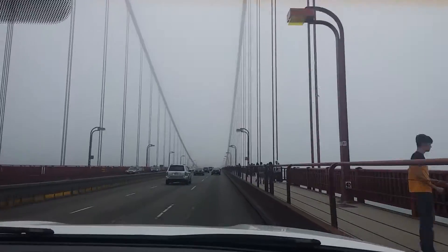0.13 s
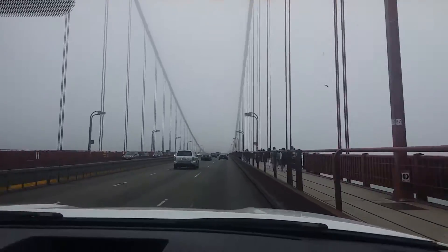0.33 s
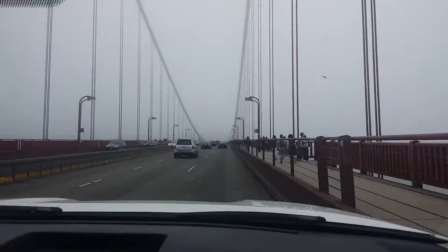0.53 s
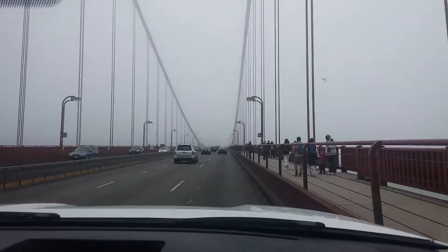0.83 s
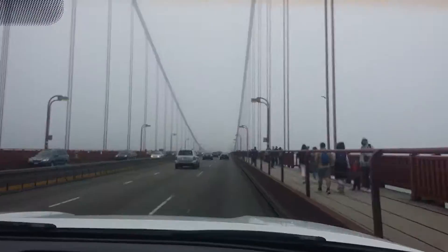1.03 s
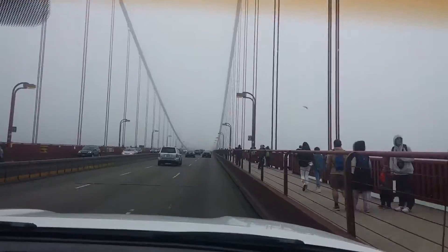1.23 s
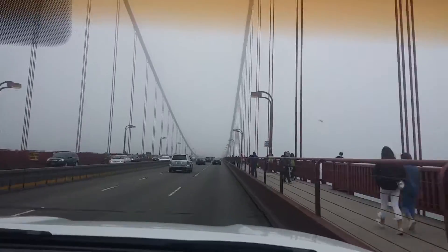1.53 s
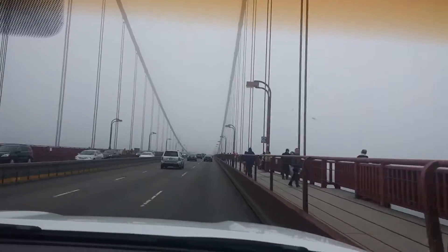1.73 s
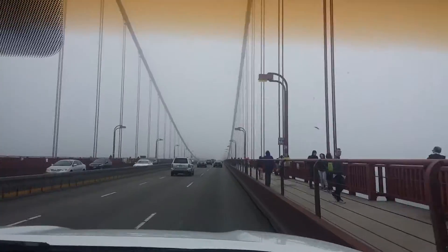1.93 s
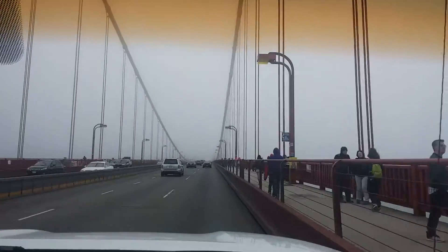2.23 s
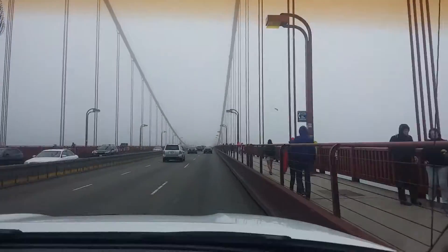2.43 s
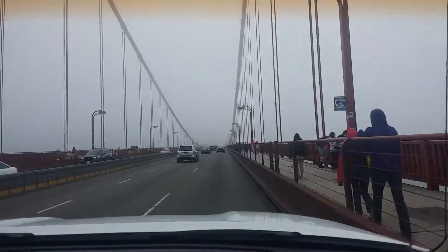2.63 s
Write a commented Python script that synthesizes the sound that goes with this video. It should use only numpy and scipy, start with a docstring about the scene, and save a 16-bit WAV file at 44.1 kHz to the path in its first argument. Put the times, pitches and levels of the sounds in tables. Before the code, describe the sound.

Deep, steady engine drone and boomy tyre roar inside a closed car cabin, bass slightly uneven with the road surface. At about 0.4-0.5 s wheels hit a joint with heavy, quick thumps, a lighter slap following at 0.6; trim rustles, ticks and squeaks faintly until 0.8. A small tick sounds near 1.3. Another double thump and rattle comes around 2.1 s, a faint slap at 2.25, then drone continues.

```python
"""Inside a car driving steadily over a bridge: the engine drones low and tyre roar booms in the cabin.
The wheels cross two road joints; each thumps the body and shakes the dashboard trim,
which rustles, ticks and gives tiny high squeaks. The drone is a sum of partials, the roar is
filtered noise, the thumps are struck resonators with noise slaps; the trim is made of
noise bursts (ticks), short chirps (squeaks) and random grains (rustle)."""
import sys
import numpy as np
from scipy import signal
from scipy.fft import rfft, irfft, next_fast_len
from scipy.io import wavfile

SR = 44100
rng = np.random.default_rng(int(sys.argv[2]) if len(sys.argv) > 2 else 0)


def log_audio(samples):
    """Write samples as a 16-bit WAV file to the path given in sys.argv[1]."""
    # one column per channel
    frames = np.atleast_2d(samples).T
    # limit to full scale, then quantise
    limited = np.clip(frames, -1, 1)
    pcm = np.round(limited * 32767).astype(np.int16)
    wavfile.write(sys.argv[1], SR, pcm)


N = 122598
T = np.arange(N) / SR   # time [s]

# Weaker engine partials: (multiple of the firing rate, level re the fundamental [dB])
ENGINE_PARTIALS = [(1.5, -15), (2, -22), (5, -27.5)]
# Tyre roar through the body: (frequency [Hz], spectral density [dB per Hz])
ROAR_SPECTRUM = [(20, -77), (35, -67), (48, -56), (61, -45.5), (76, -44.5), (95, -48.5), (117, -40),
                 (145, -47.5), (175, -57.5), (225, -56), (255, -58.5), (290, -57), (340, -60.5), (380, -55),
                 (425, -58.5), (470, -62.5), (590, -64), (665, -62), (730, -65.5), (1000, -69.5),
                 (1400, -78), (2000, -86), (3000, -91), (4500, -96.5), (6000, -105), (9300, -111),
                 (10500, -121), (15500, -118)]
# Coarseness of the road surface, as gain on the bass of the roar: (time [s], level [dB])
SURFACE_COARSENESS = [(0, 9.5), (.2, -2.5), (.4, 3.5), (.6, 2.5), (0.748, -2.5), (.9, 0), (1.3, 0.5),
                      (1.55, 3), (1.9, -1), (2.2, 2), (2.38, 3), (2.55, 0.5)]
# A wheel strikes a joint or a patch:
# (time [s], body ring level [dB], slow boom level [dB], tread slap level [dB], slap centre [Hz])
WHEEL_BUMPS = [(.423, -9.5, -17, -24.5, 610), (.453, -12, -13, -38, 540), (0.469, -16.5, -16.5, -31, 550),
               (0.486, -22, -17, -37, 500), (.613, -24, -37, -21.5, 600), (2.055, -10.5, -28, -25, 450),
               (2.071, -8, -20, -21, 430), (2.096, -18, -27.5, -46, 490), (2.129, -31, -10.5, -30, 600),
               (2.254, -28, -35, -24.5, 500), (2.269, -26, -36, -31.5, 410)]
# Modes of body panels and cabin air: (frequency [Hz], level re the blow [dB], t60 [s])
BODY_MODES = [(120.3, 3.5, 0.077), (137, -13, 0.36), (264, -11, .08), (418, -12, .09), (500, -44, .08)]
# Loose trim ticks: (time [s], level [dB], centre [Hz], t60 [s])
TRIM_TICKS = [(0.186, -47, 5200, .025), (.228, -50, 6000, 0.042), (.416, -46, 5200, 0.07),
              (.423, -40, 3000, 0.034), (.452, -48, 4200, .035), (.465, -41, 3000, .025),
              (0.48, -39, 3800, 0.034), (.505, -46, 5200, 0.033), (.749, -50, 6500, .04),
              (.777, -53, 7500, 0.032), (1.198, -47, 3800, .03), (1.281, -35.5, 2350, 0.037),
              (1.2963, -41.5, 5030, 0.021), (1.452, -40, 2600, 0.025), (2.072, -42.5, 3940, 0.034),
              (2.087, -46, 4000, .035), (2.105, -38, 2920, .03), (2.135, -50, 8000, .035),
              (2.161, -52, 5470, 0.047), (2.177, -47, 5200, 0.039), (2.232, -50, 6200, .03),
              (2.255, -40, 5000, .05)]
# Treble roll-off of the ticks: (frequency [Hz], gain [dB])
TICK_ROLL_OFF = [(9400, -3.5), (10300, -13.5), (15000, -14)]
# Plastic rubbing on plastic: (time [s], level [dB], strongest, second partial [Hz])
TRIM_SQUEAKS = [(0.0575, -58, 9120), (0.1196, -54, 8680), (0.1845, -55, 8820), (0.2116, -56, 9110),
                (0.411, -51, 9130), (0.4334, -53, 9200), (0.4594, -53, 9210), (0.4918, -56, 8880),
                (0.5671, -62.5, 8600), (0.6459, -60, 8860), (0.7053, -57, 9190), (0.7245, -53, 9170),
                (0.7453, -50, 9210), (0.7664, -53, 9100), (0.803, -52, 9080), (1.266, -57, 8900),
                (1.297, -56, 8790), (1.4706, -56.5, 8820), (1.5304, -63, 8900), (2.075, -68, 8880),
                (2.1036, -56, 9180), (2.14, -54, 8940), (2.3441, -56.5, 9140), (2.3645, -60, 8800),
                (2.383, -61, 8960), (2.4438, -61, 9260), (2.6993, -54.5, 9130)]
# Partials of a squeak, lowest first: (level re the squeak [dB])
SQUEAK_PARTIALS = [-5.5, -5, -16]
# How hard the trim is shaken; only departures from the mean count: (time [s], level [dB])
TRIM_SHAKE = [(0.022, -58.5), (.2, -60), (0.388, -61.5), (.42, -52), (0.501, -56), (.62, -65), (.75, -64),
              (.87, -73.5), (1.15, -77.5), (1.278, -64.5), (1.601, -70), (2.04, -73.5), (2.08, -59),
              (2.301, -61.5), (2.55, -73.5)]
# Colour of the rustle: (frequency [Hz], relative level [dB])
RUSTLE_SPECTRUM = [(1000, -1), (2800, 5), (4500, -3.5), (6000, -11), (8200, -15), (9100, -7),
                   (10400, -21.5), (12500, -33), (13500, -18.5), (15500, -17)]

# Engine: firing rate, its wander, initial rms level of the fundamental and its fade
ENGINE_HZ, ENGINE_WANDER_HZ, ENGINE_DB, ENGINE_FADE_DB_PER_S = 76.55, .04, -22.5, 1.5
PARTIAL_FLUTTER_DB, PARTIAL_FLUTTER_HZ = 2.5, 8
# Tyres: top of the bass that the surface swells; rise and flutter of the roar above it
SURFACE_BELOW_HZ, ROAR_RISE_DB_PER_S, ROAR_FLUTTER_DB = 350, 0.53, 0.5
# Joints: slow boom of the cabin, softness of the tyre's blow, and the tread slap
BOOM_HZ, BOOM_T60_S, CONTACT_S = 67.6, 0.23, 0.0012
LOW_CUT_HZ = 46.6   # low cut of the microphone, thinning the deepest part of the thumps
SLAP_T60_S, SLAP_WIDTH_OCT = 0.075, 0.33
TICK_WIDTH_OCT, TICK_ATTACK_S = 0.5, 0.0007
# Squeaks: length, relative fall and relative unsteadiness of pitch
SQUEAK_S, SQUEAK_SAG, SQUEAK_JITTER = .02, 0.0068, .006
# Rustle: base level, dB gained per dB of shaking, flutter and mean rate of contacts
RUSTLE_DB, RUSTLE_FOLLOWS, RUSTLE_FLUTTER_DB, RUSTLE_GRAINS_PER_S = -60.5, 0.78, 2, 3300
CUTOFF_HZ = 15700


def engine():
    """Periodic excitation: partials locked to one firing phase, the weaker ones fluttering in level."""
    firing_hz = ENGINE_HZ + ENGINE_WANDER_HZ * drift(0.77)
    phase = 2 * np.pi * np.cumsum(firing_hz) / SR
    tone = np.sin(phase)
    for multiple, db in ENGINE_PARTIALS:
        flutter_db = PARTIAL_FLUTTER_DB * drift(PARTIAL_FLUTTER_HZ)
        tone += from_db(db + flutter_db) * np.sin(multiple * phase)
    # a sine of unit rms has height sqrt(2)
    return np.sqrt(2) * from_db(ENGINE_DB - ENGINE_FADE_DB_PER_S * T) * tone


def tyres():
    """Random excitation: road noise shaped by cabin resonances; coarse stretches swell its bass."""
    white = rng.standard_normal(N) * np.sqrt(SR / 2)   # unit power per Hz
    roar = colour(white, ROAR_SPECTRUM)
    low_pass = signal.butter(2, SURFACE_BELOW_HZ, fs=SR, output="sos")
    bass = signal.sosfiltfilt(low_pass, roar)
    times, coarse_db = np.transpose(SURFACE_COARSENESS)
    upper_db = ROAR_RISE_DB_PER_S * T + ROAR_FLUTTER_DB * drift(21)
    return bass * from_db(np.interp(T, times, coarse_db)) + (roar - bass) * from_db(upper_db)


def joints():
    """Impulse response: each bump rings the body modes and slow boom, with a short slap of the tread."""
    times, ring_db, boom_db, slap_db, slap_hz = np.transpose(WHEEL_BUMPS)
    blows, heaves = np.zeros((2, N))
    struck = (times * SR).astype(int)
    blows[struck] = from_db(ring_db)
    heaves[struck] = from_db(boom_db)
    body = ring(heaves, BOOM_HZ, BOOM_T60_S)
    for hz, db, t60 in BODY_MODES:
        body += from_db(db) * ring(blows, hz, t60)

    # a blow of finite contact time excites the treble less
    soft = np.exp(-1 / (CONTACT_S * SR))
    softened = signal.lfilter([1 - soft], [1, -soft], body)
    low_cut = signal.butter(4, LOW_CUT_HZ, "high", fs=SR, output="sos")
    out = signal.sosfilt(low_cut, softened)
    for start, db, hz in zip(times, slap_db, slap_hz):
        out += from_db(db) * burst(start, CONTACT_S, SLAP_T60_S) * noise_band(hz, SLAP_WIDTH_OCT)
    return out


def trim_ticks():
    """Damped impact: loose plastic parts knock, each a decaying noise burst in its own broad band."""
    knocks = np.zeros(N)
    for start, db, hz, t60 in TRIM_TICKS:
        knocks += from_db(db) * burst(start, TICK_ATTACK_S, t60) * noise_band(hz, TICK_WIDTH_OCT)
    return colour(knocks, TICK_ROLL_OFF)


def trim_squeaks():
    """Stick-slip friction: brief chirps of three harmonic partials, sagging slightly in pitch."""
    out, jitter = np.zeros(N), SQUEAK_JITTER * drift(400)
    for time, db, hz in TRIM_SQUEAKS:
        # the chirp begins a sixth of its length before the listed time
        span = np.abs(T - time - SQUEAK_S / 3) < SQUEAK_S / 2
        progress = np.linspace(0, 1, span.sum())
        pitch = 1 + SQUEAK_SAG * (.5 - progress) + jitter[span]
        phase = 2 * np.pi * np.cumsum(hz / 2 * pitch) / SR   # hz is the second partial
        envelope = np.sin(np.pi * progress) ** 2
        for number, partial_db in enumerate(SQUEAK_PARTIALS, 1):
            out[span] += envelope * from_db(db + partial_db) * np.sin(number * phase)
    return out


def trim_rustle():
    """Random impacts: dense tiny contacts in the dashboard, louder the harder it is shaken."""
    times, db = np.transpose(TRIM_SHAKE)
    shake_db = np.interp(T, times, db)
    contact = rng.random(N) < RUSTLE_GRAINS_PER_S / SR
    grains = contact * rng.standard_normal(N)
    level_db = RUSTLE_DB + RUSTLE_FOLLOWS * (shake_db - shake_db.mean())
    level_db += RUSTLE_FLUTTER_DB * drift(40)
    return from_db(level_db) * rms_one(colour(grains, RUSTLE_SPECTRUM))


def ring(clicks, hz, t60):
    """Damped resonance: a unit click sets a decaying sine of initial height 1 ringing."""
    radius, angle = np.exp(-np.log(1000) / (t60 * SR)), 2 * np.pi * hz / SR
    feedback = [1, -2 * radius * np.cos(angle), radius * radius]
    return signal.lfilter([0, np.sin(angle)], feedback, clicks + 1e-18)


def burst(start, attack, t60):
    """Transient envelope: a quick rise and an exponential decay."""
    age = np.maximum(T - start, 0)
    decay = np.exp(-np.minimum(np.log(1000) * age / t60, 20))
    return (1 - np.exp(-age / attack)) * decay


def noise_band(hz, octaves):
    """Band-limited noise: unit rms, reaching so many octaves either side of a centre."""
    edges = np.clip([hz / 2 ** octaves, hz * 2 ** octaves], 10, CUTOFF_HZ)
    band = signal.butter(2, edges, "band", fs=SR, output="sos")
    return rms_one(signal.sosfilt(band, rng.standard_normal(N)))


def colour(x, spectrum):
    """Linear filtering: gain from a table of (frequency [Hz], level [dB]), interpolated in log frequency."""
    hz, db = np.transpose(spectrum)
    size = next_fast_len(N + 8192)
    bins = np.maximum(np.fft.rfftfreq(size, 1 / SR), 1)
    gain = from_db(np.interp(np.log(bins), np.log(hz), db))
    return irfft(rfft(x, size) * gain, size)[:N]


def drift(rate):
    """Random fluctuation: noise of unit rms, low-passed by two equal poles at a rate in Hz."""
    pole = np.exp(-2 * np.pi * rate / SR)
    noise = rng.standard_normal(N + SR)   # the first second lets the filter settle
    return rms_one(signal.lfilter([1], [1, -2 * pole, pole * pole], noise)[SR:])


def rms_one(x):
    """Normalisation: scale to unit rms."""
    return x / np.sqrt(np.mean(x ** 2) + 1e-20)


def from_db(db):
    """Logarithmic level: decibels to amplitude gain."""
    return 10 ** (np.asarray(db) / 20)


def scene():
    """Superposition: the pressures of all sources in the cabin add."""
    road = engine() + tyres() + joints()
    trim = trim_rustle() + trim_ticks() + trim_squeaks()
    return (road + trim)[None]


def record(dry):
    """Band limiting: a steep elliptic low-pass cuts the top."""
    return signal.sosfilt(signal.ellip(10, .1, 80, CUTOFF_HZ, fs=SR, output="sos"), dry)


dry = scene()
out = record(dry)
log_audio(out)
```